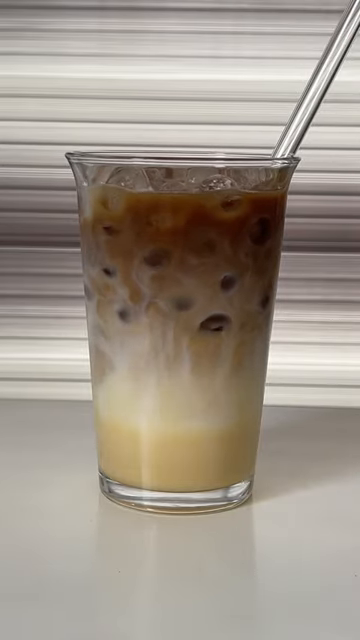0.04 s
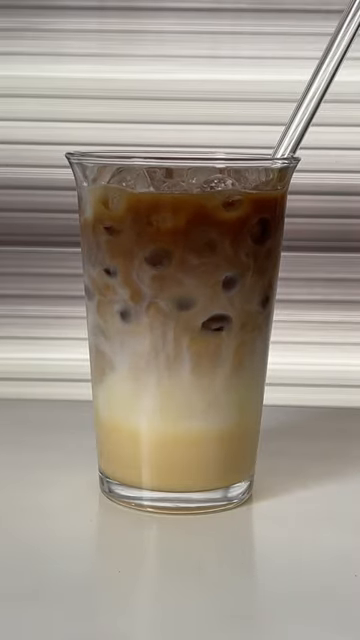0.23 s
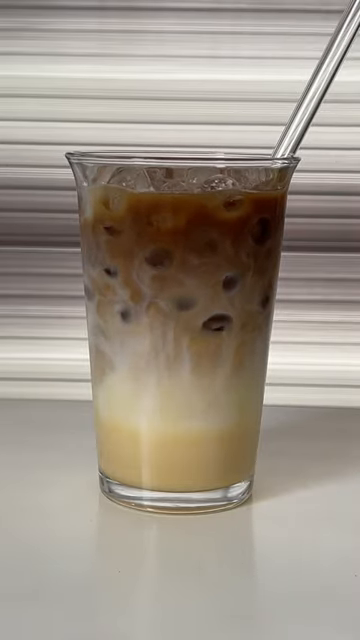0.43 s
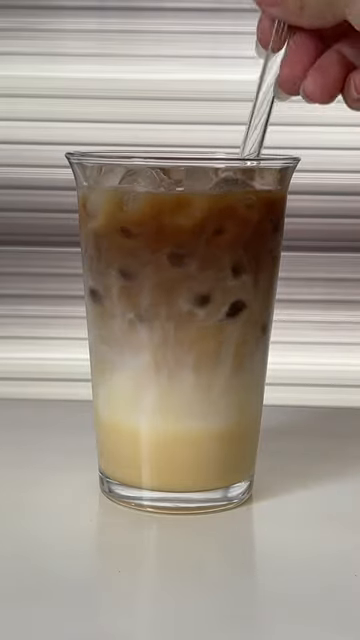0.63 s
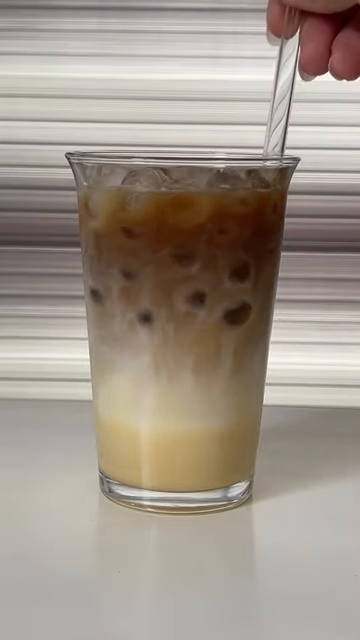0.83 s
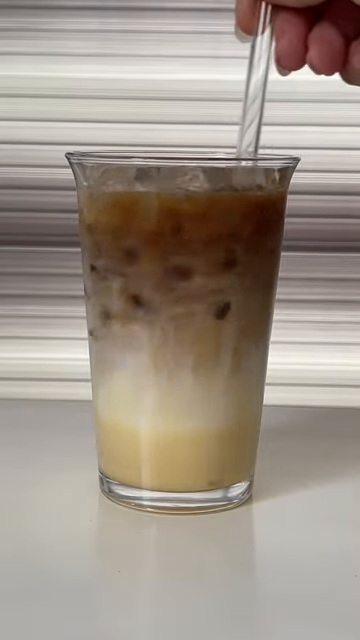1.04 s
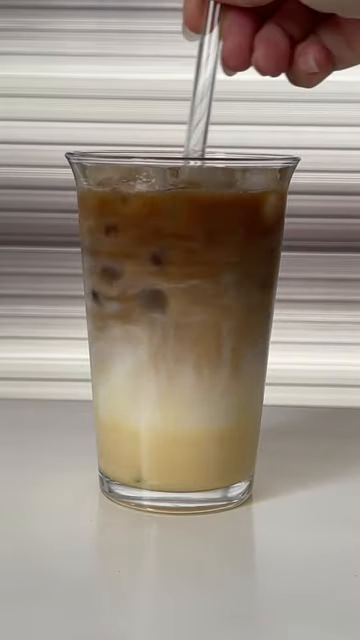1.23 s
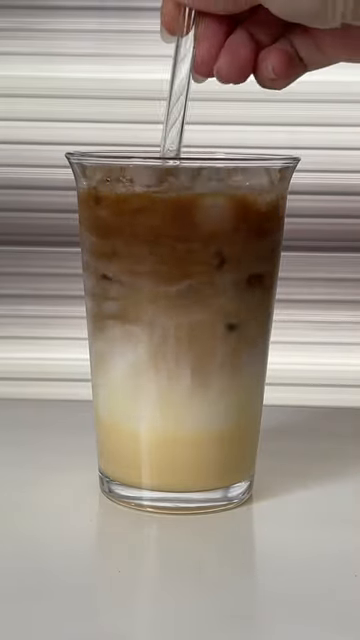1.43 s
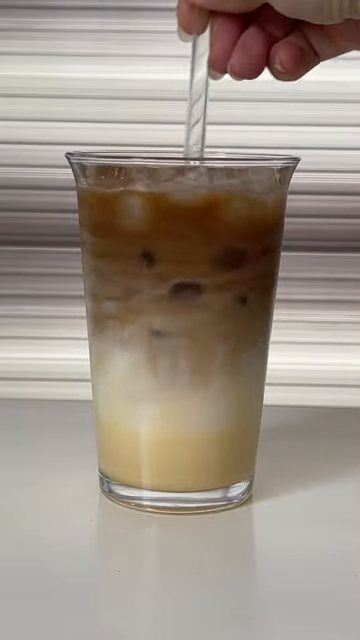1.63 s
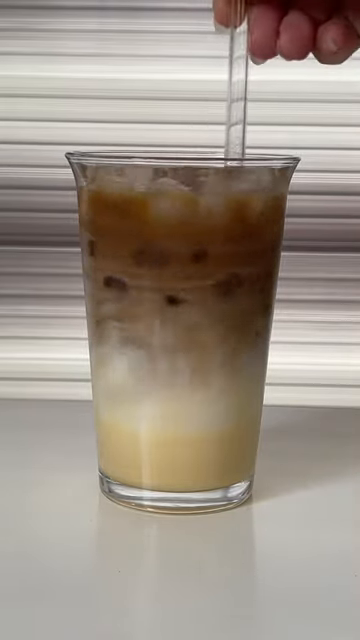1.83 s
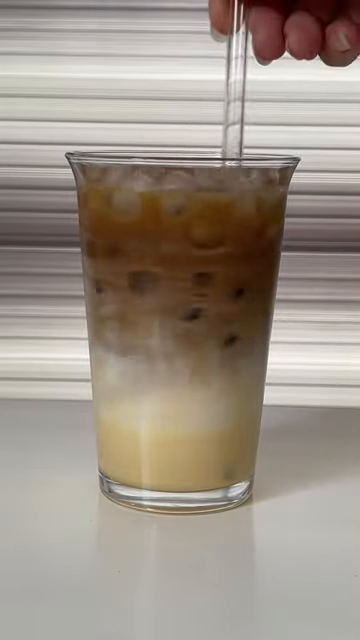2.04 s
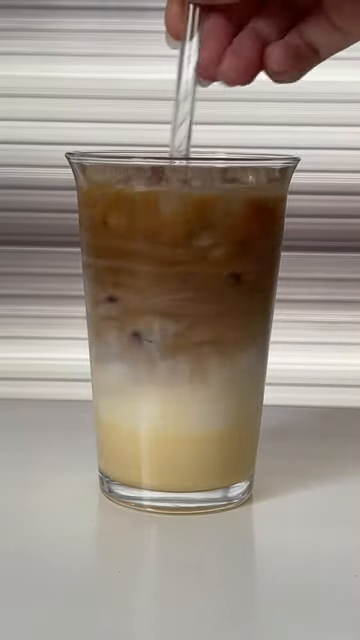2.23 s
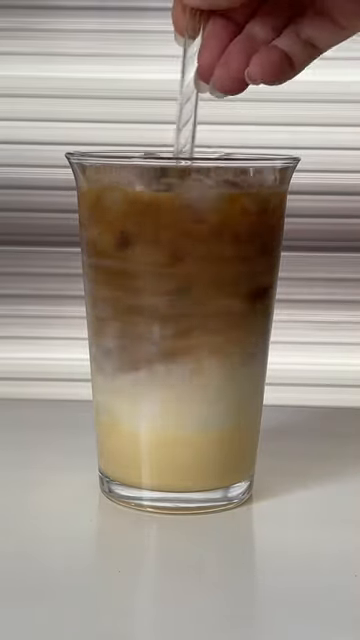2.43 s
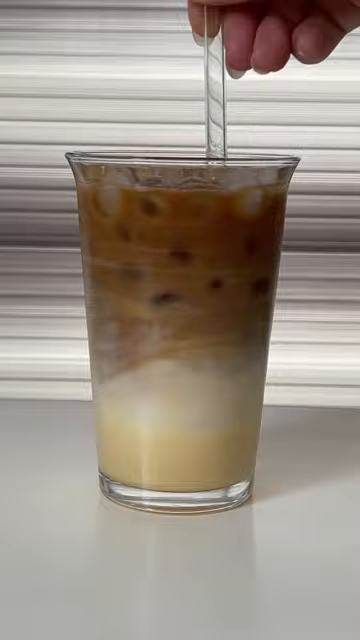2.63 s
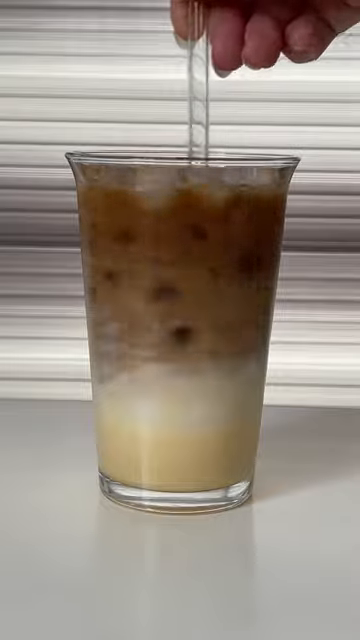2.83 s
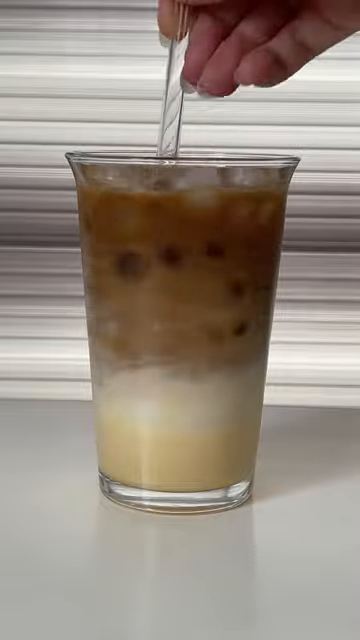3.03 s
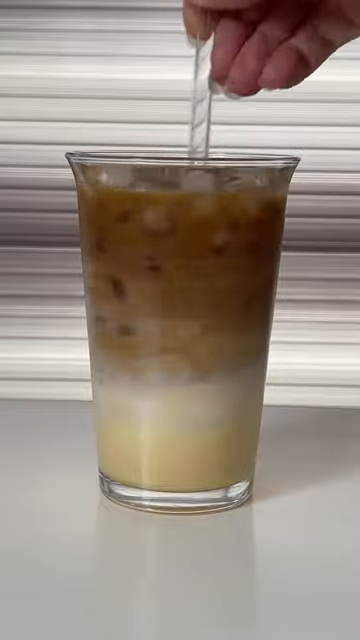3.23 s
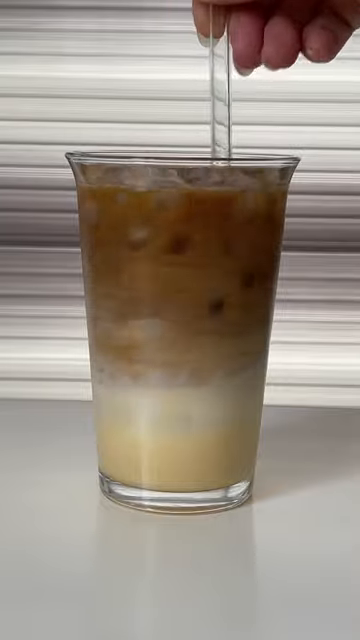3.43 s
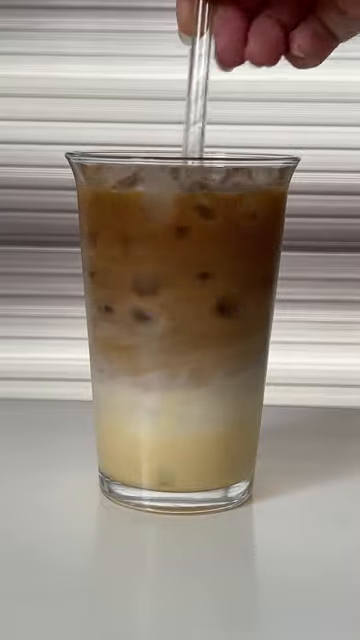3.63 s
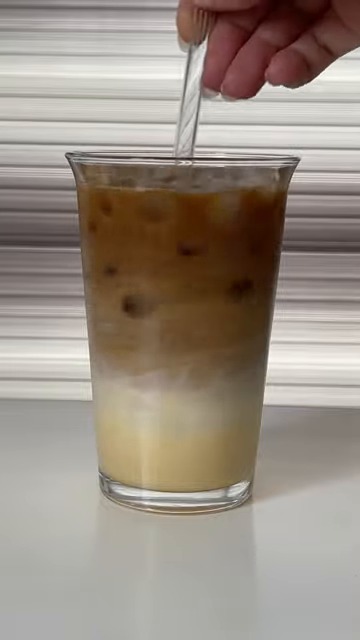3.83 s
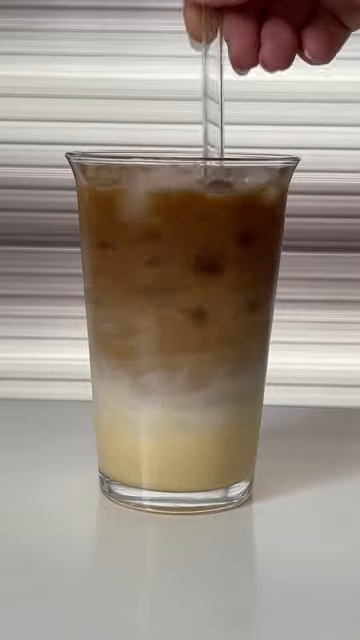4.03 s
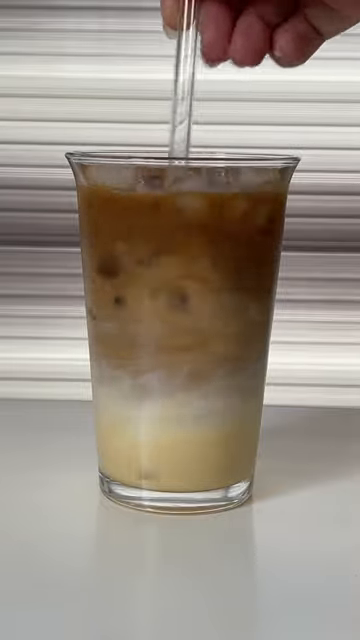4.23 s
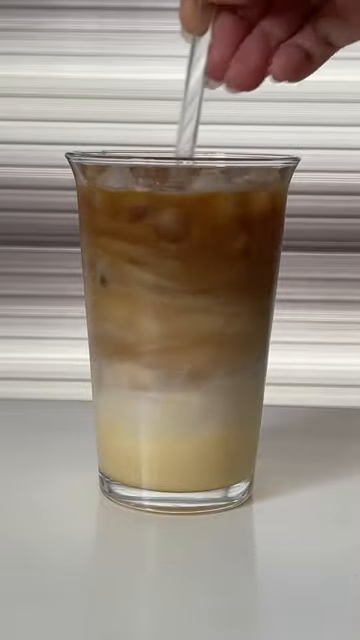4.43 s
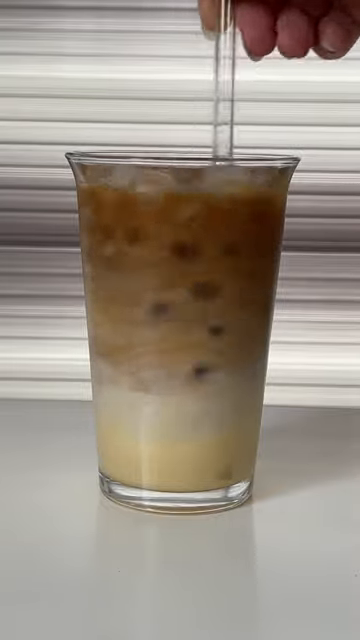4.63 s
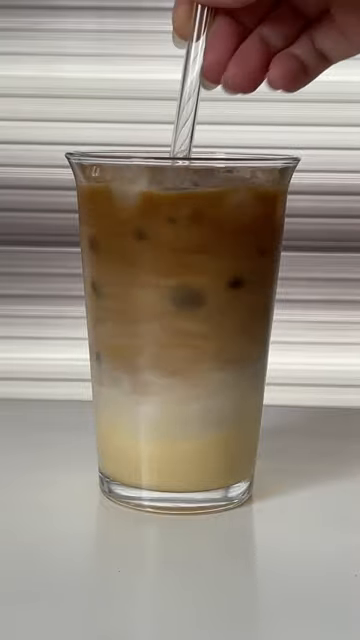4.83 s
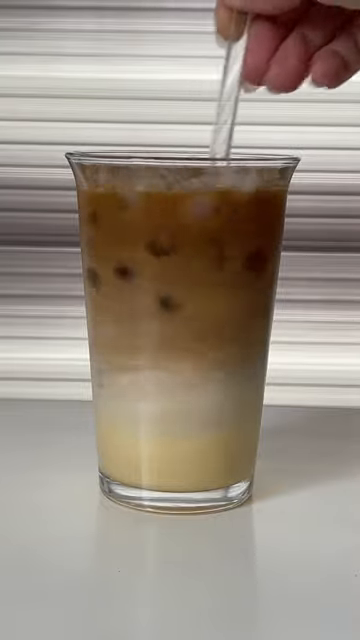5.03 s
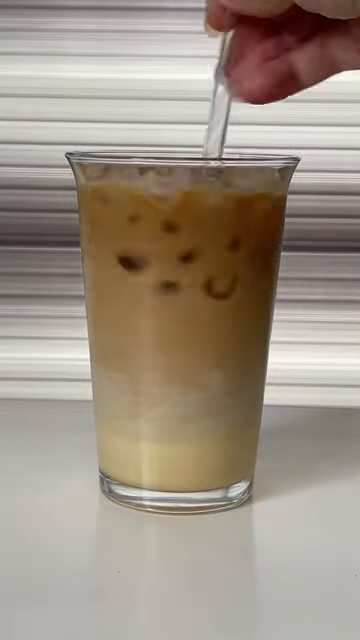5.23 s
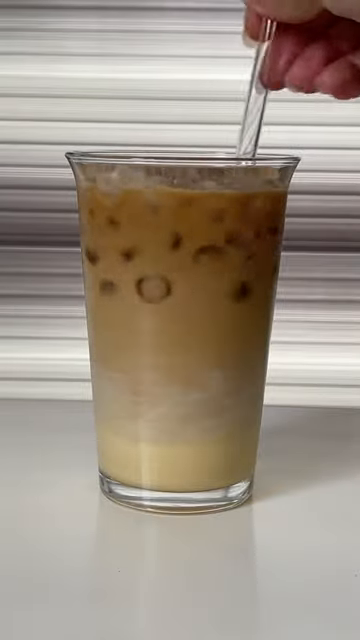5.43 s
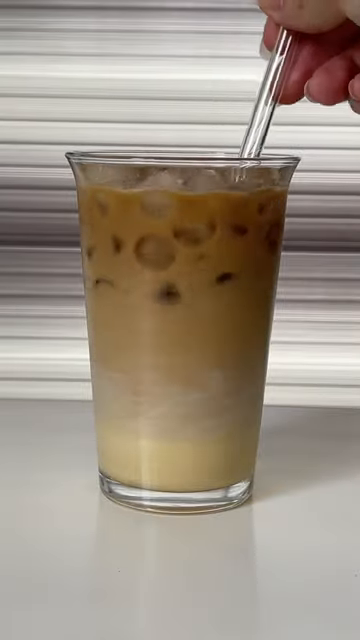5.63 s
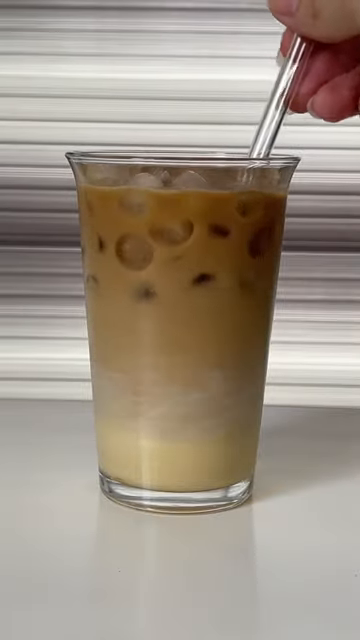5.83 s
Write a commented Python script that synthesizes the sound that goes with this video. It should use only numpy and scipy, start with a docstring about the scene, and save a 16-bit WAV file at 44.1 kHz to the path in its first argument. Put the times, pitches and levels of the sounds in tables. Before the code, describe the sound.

A glass straw stirs iced coffee: dense, bright, short ice clinks, swelling and easing, with a few dull knocks on the glass bottom.

```python
"""Ice cubes, stirred with a glass straw, strike a full tall glass: filtered blows excite its damped modes.
Blows of the straw on the bottom rock glass and table as lower modes, with a short diffuse echo.
Coloured noise gives the slosh of the drink, the hush of the quiet room and a low shaking of table and air.
The sound drops out twice for a moment; the two channels differ mostly by a turn of phase."""
import sys
import numpy as np
from scipy import signal
from scipy.fft import rfft, irfft, next_fast_len
from scipy.io import wavfile
from scipy.ndimage import uniform_filter1d

SR = 44100
rng = np.random.default_rng(int(sys.argv[2]) if len(sys.argv) > 2 else 0)


def volts(x):
    """Linear amplitude factor 10**(x/20) for a level x in dB, scalar or array-like."""
    e = np.asarray(x, float) / 20
    return 10 ** e


def transcribe(signal):
    """Save signal, clipped to [-1, 1], as a 16-bit WAV file at the path in sys.argv[1]."""
    frames = np.atleast_2d(signal).T
    limited = np.clip(frames, -1, 1)
    pcm = np.round(limited * 32767).astype(np.int16)
    wavfile.write(sys.argv[1], SR, pcm)


N = 260190


def unit_rms(x):
    """Power normalisation: scales a signal to rms 1."""
    return x / np.sqrt(np.mean(x ** 2) + 1e-20)


def read_spectrum(points, hz):
    """Logarithmic frequency scale: interpolates the level between tabled points."""
    f, value = np.transpose(points)
    return np.interp(np.log(hz + 1), np.log(f + 1), value)


def noise(spectrum):
    """Spectral shaping: steady white noise is filtered to the given colour, at rms 1."""
    hz = np.fft.rfftfreq(N, 1 / SR)
    white = rng.standard_normal(N)
    return unit_rms(irfft(rfft(white) * volts(read_spectrum(spectrum, hz)), N))


def swelling(rows, rest_db, rise_db_per_s, fall_db_per_s):
    """Exponential growth and decay: events (start, length, level) add in power to a resting level."""
    t = np.arange(0, N + 64, 64) / SR
    power = volts(rest_db) ** 2
    for start, length, db in rows:
        before = np.maximum(start - t, 0)
        after = np.maximum(t - start - length, 0)
        power = power + volts(db - rise_db_per_s * before - fall_db_per_s * after) ** 2
    return np.interp(np.arange(N) / SR, t, np.sqrt(power))


def ring(modes):
    """Modal superposition: exponentially decaying sines answer one click."""
    t = np.arange(4096) / SR
    return sum(volts(db - 60 * t / t60) * np.sin(2 * np.pi * hz * t) for hz, db, t60 in modes)


# colour of the room hush: (frequency [Hz], relative density [dB])
ROOM_COLOUR = [(15, -71), (25, -33), (38, -25), (59, -5.5), (81, -12.5), (165, -28), (193, -12.5),
               (800, -30), (3450, -43), (5000, -47), (8000, -42), (13100, -31.5)]
ROOM_DB = -72.5  # rms


def room_hush():
    """Stationary background noise: a steady coloured hush common to both channels."""
    return volts(ROOM_DB) * noise(ROOM_COLOUR)


# colour of the low shaking: (frequency [Hz], relative level [dB])
SHAKE_COLOUR = [(25, -40), (40, 8.5), (57, 8), (90, 2.5), (160, -5.5), (300, -29)]
# its swells: (time [s], level [dB])
SWELLS = [(1.48, -65), (1.77, -69), (1.99, -63), (2.55, -68), (3.27, -66), (4.03, -66), (4.58, -59.5),
          (4.78, -59), (4.95, -51.5), (5.15, -59.5), (5.39, -60.5), (5.67, -64)]


def rumble():
    """Amplitude modulation: low noise of the shaking table and air swells over a steady level."""
    events = [(s, 0, db) for s, db in SWELLS]
    gain = swelling(events, rest_db=-75.5, rise_db_per_s=65, fall_db_per_s=125)
    return gain * noise(SHAKE_COLOUR)


# sweeps of the straw through the cubes: (start [s], length [s], jostle level [dB])
STROKES = [(.52, 0.043, -65.5), (.7, 0.062, -64.5), (.9, 0.022, -60.5), (1.13, 0.077, -65), (1.3, .38, -50),
           (1.8, 0.062, -60), (1.92, 0.024, -67.5), (2.04, 0.062, -65), (2.16, 0.21, -52.5),
           (2.5, 0.038, -57), (2.66, 0.074, -65), (2.79, 0.017, -55), (2.96, .03, -67.5), (3.07, 0.27, -55),
           (3.42, .05, -65.5), (3.55, 0.15, -60.5), (3.85, 0.2, -50.5), (4.14, 0.057, -61.5),
           (4.33, 0.028, -55.5), (4.44, .14, -44.5), (4.68, 0.13, -56.5), (4.95, 0.2, -47),
           (5.3, 0.038, -55.5), (5.51, .04, -66.5), (5.63, 0.12, -64), (5.82, 0.021, -68.5)]


def stirring():
    """Exponential envelope: how strongly the cubes jostle over time."""
    return swelling(STROKES, rest_db=-77.5, rise_db_per_s=135, fall_db_per_s=137)


def jostling():
    """Gated envelope: the stirring, silent until the first drop-out has ended."""
    return stirring() * (np.arange(N) > GAPS[0][1] * SR)


# colour of the hush that differs between the channels: (frequency [Hz], relative level [dB])
APART_COLOUR = [(60, -26), (150, -21.5), (400, -14.5), (900, -17.5), (1500, -20.5), (2200, -71)]


def channel_hush():
    """Interchannel decorrelation: noise of opposite sign left and right, partly following the stirring."""
    gain = volts(ROOM_DB - 6.5) + volts(-34.5) * stirring()
    return gain * noise(APART_COLOUR)


def contact(rise_s, fall_s):
    """Contact mechanics: how hard ice presses during a blow, at unit energy."""
    t = np.arange(4096) / SR
    rise = (t / rise_s) ** 2 / (1 + (t / rise_s) ** 2)
    shape = rise * np.exp(-t / fall_s)
    return shape / np.linalg.norm(shape)


# clear knocks: (time [s], level [dB], frequency of the mode favoured by the struck spot [Hz],
# least share of the deep wall modes [dB], least share of the sharp top modes [dB])
KNOCKS = [(0.4204, -53, 10200, -28, -8), (0.5052, -32.5, 2230, -9, -21), (0.5114, -39, 1670, -21, -27),
          (0.608, -39.5, 1730, -10, -18), (0.625, -30.5, 7260, -14, -19), (0.6602, -21, 4280, -14.5, -17),
          (0.7111, -34.5, 4540, -22, -32), (0.7382, -54, 7210, -4, -26), (0.7648, -36.5, 2200, -2, -36),
          (0.8082, -38.5, 7100, -5.5, -25), (0.8482, -41, 1660, -19, -29), (0.8769, -36, 7200, -13, -9),
          (0.8912, -31.5, 7150, -22, -7), (0.9228, -40.5, 2260, -17, -2), (0.9367, -35.5, 7410, -18, -13),
          (0.9826, -34.5, 2220, -4.5, -22), (1.0143, -30, 7600, -15, -18), (1.0876, -41, 2230, -17, -25),
          (1.112, -36.5, 4600, -14, -16), (1.1258, -39, 7300, -12, -29), (1.1715, -37.5, 1720, -7, -12),
          (1.219, -44, 1680, -17, -18), (1.2745, -34, 7300, -15, -23), (1.2814, -33, 4480, -11, -30),
          (1.2944, -35, 7600, -22, -19), (1.3033, -47, 1690, -25, -20), (1.3448, -45, 4530, -24, -26),
          (1.3654, -33, 4530, -17, -27), (1.4168, -28, 7580, -12, -22), (1.4264, -27, 4370, -9, -23),
          (1.4564, -27, 4380, -25, -21), (1.4701, -26, 2000, -19, -14), (1.5026, -23, 7600, -16, -15),
          (1.5124, -24.5, 7600, -21, -18), (1.5723, -30, 7060, -15, -14), (1.5774, -28.5, 4300, -14, -4.5),
          (1.62, -28.5, 7280, -11, -7), (1.6356, -22, 7400, -18, -4), (1.6465, -19, 7700, -19, -11),
          (1.651, -31, 7200, -18, -18), (1.6684, -26, 7400, -15, -20), (1.7449, -30.5, 7360, -26, -28),
          (1.788, -42.5, 7420, -9, -8), (1.8209, -22.5, 7660, -40, -17), (1.839, -23.5, 7600, -34, -18),
          (1.8474, -39, 7380, -21, -19), (1.9756, -48, 1680, -11, -25), (2.0259, -44, 1710, -2, -30),
          (2.1136, -34.5, 4450, -10, -23), (2.144, -33.5, 4490, -25, -6), (2.1502, -35, 4510, -24, -18),
          (2.183, -49, 3260, -18, -9), (2.1937, -36, 1650, -10, -3), (2.2124, -26, 1690, -13, -14),
          (2.2268, -41, 1700, -15, -19), (2.2754, -29, 7460, -8.5, -24), (2.2858, -33, 1680, -4, -14),
          (2.3156, -23.5, 3700, -27, -25), (2.3392, -32, 3840, -15, -15), (2.4581, -31, 1880, -14.5, -18),
          (2.4713, -33, 1690, -6, -22), (2.4909, -35.5, 6960, -14, -27), (2.5478, -35.5, 1750, -5, -8),
          (2.579, -32.5, 2220, -20, -23), (2.6244, -40.5, 7240, -4.5, -23), (2.6542, -39, 2100, -5.5, -31),
          (2.7046, -38, 1780, -14, -22), (2.7173, -30.5, 2140, -19, -15), (2.7733, -31.5, 1620, -14, -41),
          (2.9536, -41.5, 2350, -11, -25), (3.0395, -35.5, 1650, -17, -20),
          (3.0775, -31.5, 7500, -10.5, -14), (3.0921, -25.5, 7440, -22, -26), (3.1564, -32, 4150, -9, -14),
          (3.1897, -32.5, 7000, -15, -23), (3.2125, -36.5, 7120, -21, -9), (3.2284, -36.5, 1650, -16, -11),
          (3.2869, -33, 2210, -6, -16), (3.3458, -36, 1570, -11, -20), (3.4122, -36.5, 2240, -6, -22),
          (3.4882, -41, 7640, -11, -17), (3.5235, -36, 7250, -6, -12), (3.5473, -50, 1510, -19, -10),
          (3.5597, -27, 7200, -15, -25), (3.5922, -40, 7300, -9, -21), (3.6496, -36.5, 10900, -8.5, -17),
          (3.693, -45, 1700, -15, -25), (3.726, -34, 7500, -20, -22), (3.7331, -27.5, 7600, -13, -20),
          (3.78, -36, 4500, -11, -11), (3.8257, -35, 7500, -22, -8), (3.8573, -27.5, 10700, -10, -12),
          (3.8727, -25, 4510, -24, -18), (3.8812, -28.5, 11000, -9, -4), (3.907, -11.5, 7200, -23, -5),
          (3.935, -28, 7040, -20, -7), (3.9567, -21.5, 7550, -20, -18), (3.9948, -28, 7700, -20, -16),
          (4.0041, -18.5, 7200, -14.5, -26), (4.017, -26, 7250, -13, -17), (4.0253, -33, 7230, -12, -21),
          (4.0946, -37, 4440, -6, -30), (4.164, -43.5, 1660, -15, -3), (4.2808, -27.5, 7960, -11.5, -16),
          (4.2904, -30, 7460, -10, -14), (4.3018, -23, 7800, -11.5, -22), (4.3784, -31.5, 3730, -29, -8),
          (4.401, -31, 4330, -20, -19), (4.4238, -20.5, 4440, -19, -10), (4.4774, -20.5, 1780, -26, -13),
          (4.4996, -32.5, 1680, -10, -9), (4.5198, -17, 7300, -23, -11), (4.5376, -17, 6730, -16, -12),
          (4.5382, -12, 1710, -16.5, -3.5), (4.5586, -22, 11100, -20, -13), (4.576, -25.5, 7400, -22, -18),
          (4.6058, -28, 7400, -18, -21), (4.6585, -27.5, 1710, -11.5, -14.5),
          (4.755, -33.5, 4550, -3.5, -13), (4.8001, -29.5, 7250, -21, -23), (4.8514, -32.5, 7350, -14, -8),
          (4.8755, -34.5, 2240, -18, -11), (4.8947, -23, 4430, -16, -6), (4.9412, -25.5, 4500, -27, -15),
          (4.9576, -26.5, 1680, -16, -0.5), (4.9786, -21.5, 7240, -20, -7), (5.0493, -20.5, 7070, -40, -8),
          (5.083, -29, 1830, -14, -11), (5.0992, -23.5, 7800, -8, -17), (5.1063, -25.5, 1680, -19, -13),
          (5.1396, -26, 2170, -12, -8), (5.1716, -37, 7250, -18, -17), (5.247, -31, 7360, -10, -22),
          (5.2976, -30.5, 7400, -15, -18), (5.3049, -30.5, 4600, -16, -31), (5.3178, -35, 4450, -14, -22),
          (5.3552, -38, 7200, -17, -14), (5.374, -30.5, 7200, -15, -24), (5.4196, -36, 4440, -14, -22),
          (5.4996, -36, 4500, -14, -21), (5.5102, -32, 7300, -11, -25), (5.5234, -44, 4500, -6, -10),
          (5.5582, -40, 7150, -6, -37), (5.6224, -34, 3350, -6, -28), (5.6332, -32, 1760, -9, -22),
          (5.6456, -27.5, 1910, -19, -17.5), (5.7398, -39, 4520, -10, -26), (5.7474, -38.5, 2170, -9, -28),
          (5.7702, -48, 7460, -5, -20), (5.8094, -37.5, 4520, -23, -33), (5.8296, -34, 7210, -11.5, -15)]
# frequency bands of the glass: (low edge [Hz], high edge [Hz])
BANDS = [(1000, 2100), (2100, 3800), (3800, 6000), (6000, 9000), (9000, 11800)]
# modes of the filled glass: (frequency [Hz], relative level within its band [dB], t60 [s])
GLASS_MODES = [(1346, 3, 0.086), (1676, 11.5, 0.046), (1820, 14, 0.015), (2275, 3, 0.026),
               (2680, 3.5, 0.011), (3045, -6, 0.03), (4520, 10.5, 0.012), (4720, -6.5, 0.033),
               (5100, 1.5, 0.02), (7324, 0.5, 0.0097), (7210, -13.5, 0.014), (7750, -3.5, 0.011),
               (8300, -4, 0.0096), (10210, -0.5, 0.019), (11000, 8, 0.01), (9900, -37, 0.0092)]
# small knocks per band: (level [dB])
JOSTLE_DB = [-10.5, -14.5, -6.5, -4, -9]
# bare crack beside the modes per band: (relative level [dB])
CRACK_DB = [-3.5, 4, -6, -20.5, -3]
# crackle that differs left and right per band: (relative level [dB])
UNLIKE_DB = [-21, -12, -9, -12, -11]
# gain of the clear knocks per band: (gain [dB])
KNOCK_DB = [6, 5.8, 8.7, 12.9, 17.2]


def ice():
    """Modal excitation: each blow, a tap and a puff of crackle, drives glass modes and crack by chance amounts."""
    time_s, level_db, favoured_hz, deep_db, sharp_db = np.transpose(KNOCKS)
    span = next_fast_len(N + 4096)
    at = np.round(time_s * SR).astype(int)
    small = np.flatnonzero(rng.random(N) < 220 / SR)  # 220 small knocks a second on average
    size_db = 3.0 * np.minimum(rng.exponential(1, len(small)), 3)
    stir = jostling()
    press = contact(0.00046, 0.00056) + volts(-12) * contact(0.0049, 0.0074)
    load = np.minimum(np.arange(4096) / SR / 0.00068, 1)  # soft ice takes a moment to load the wall
    spectrum = 0
    for k, (lo, hi) in enumerate(BANDS):
        band_filter = signal.butter(3, [lo, hi], "band", fs=SR, output="sos")
        crack = signal.sosfilt(band_filter, np.eye(1, 4096)[0])
        in_band = [m for m in GLASS_MODES if lo < m[0] < hi]
        modes = [ring([m]) for m in in_band]
        whole = np.linalg.norm(modes)
        pitches = [m[0] for m in in_band] + [np.sqrt(lo * hi)]
        bodies = [m / whole for m in modes] + [volts(CRACK_DB[k]) * crack / np.linalg.norm(crack)]
        for hz, body in zip(pitches, bodies):
            chance, crackle, other = rng.standard_normal((3, N))
            small_chance_db = 7 * np.clip(chance[small], -3, 1.5)
            knock_chance_db = 7 * np.clip(chance[at], -3, 1.5)
            blows = np.zeros(N)
            blows[small] = volts(size_db + small_chance_db)
            blows = unit_rms(blows) * stir * volts(JOSTLE_DB[k])

            # modes fade away from the favoured one, 30 dB per octave, down to a least share
            if hz < 3800:
                least_db = deep_db
            elif hz > 9000:
                least_db = sharp_db
            else:
                least_db = -11
            share_db = np.maximum(-30 * abs(np.log2(hz / favoured_hz)), least_db)
            blows[at] = volts(level_db + share_db + KNOCK_DB[k] + 0.39 * knock_chance_db)

            unlike = volts(UNLIKE_DB[k]) * np.array([other, -other])
            puff = signal.oaconvolve(blows, press)[:N] * (np.sign(crackle) + unlike)
            spectrum = spectrum + rfft(puff, span) * rfft(body, span)
            spectrum = spectrum + volts(-5.0) * rfft(blows, span) * rfft(body * load, span)  # tap
    return irfft(spectrum, span)[:, :N]


# colour of the moving drink: (frequency [Hz], relative level [dB])
SLOSH_COLOUR = [(60, -48), (160, -4.5), (300, -10), (460, -4), (800, -25), (1500, -6), (3000, -17),
                (6000, -20.5), (11500, -46), (13000, -58)]


def slosh():
    """Amplitude modulation: coloured noise of the drink follows the jostling, 7 dB below it."""
    return volts(-7) * jostling() * noise(SLOSH_COLOUR)


# blows that rock the whole glass on the table: (time [s], level [dB])
THUDS = [(0.509, -55.5), (0.704, -50), (1.346, -45.5), (1.481, -50.5), (1.552, -57), (1.654, -43),
         (2.186, -50.5), (2.55, -49), (3.04, -57.5), (3.137, -47.5), (3.194, -51), (3.248, -43),
         (3.908, -39.5), (4.549, -67), (4.607, -45), (4.901, -44), (4.962, -45), (4.998, -24.5),
         (5.149, -29.5), (5.311, -51), (5.345, -39), (5.622, -41.5)]
# modes of glass and table together: (frequency [Hz], relative level [dB], t60 [s])
TABLE_MODES = [(228, -8, 0.044), (470, -11.5, 0.17), (495, -3.5, 0.04), (691, -3.5, 0.027),
               (814, -7, 0.039), (954, -11.5, 0.093)]


def thuds():
    """Forced modal response: a push of a few milliseconds with a harder tip rocks glass and table."""
    blows = np.zeros(N)
    for s, db in THUDS:
        blows[round(s * SR)] = volts(db)
    push = np.hanning(260) * np.sin(2 * np.pi * 490 * np.arange(260) / SR)
    push[90:110] += 4.2 * np.hanning(20)  # the harder tip
    thud = np.convolve(ring(TABLE_MODES), push)
    return signal.oaconvolve(blows, thud / abs(thud).max())[:N]


def echo(x):
    """Diffuse reflection: sparse taps of random sign, t60 0.15 s, from table top and nearby walls."""
    at = np.arange(300, 12000, 20)
    level = volts(-60 * at / SR / 0.15)
    taps = np.zeros(12020)
    taps[at + rng.integers(0, 20, len(at))] = rng.choice([-1., 1.], len(at)) * level
    return signal.oaconvolve(x, taps / np.linalg.norm(taps))[:N]


# phase between the channels: (frequency [Hz], lead of the left channel [rad])
PHASE_LEAD = [(0, 0), (1500, 0), (4000, .8), (4600, 1.75), (4900, 3.2), (5200, 5), (5500, 5.95),
              (5800, 6.26), (6200, 6.5), (7000, 7.55), (8500, 9), (9500, 9.6), (11500, 11.6), (12000, 12.6),
              (13500, 12.9)]


def turn_phase(x):
    """Interchannel phase difference: left advances and right lags by half the lead at each frequency."""
    size = next_fast_len(N + 4096)
    lead = np.interp(np.fft.rfftfreq(size, 1 / SR), *np.transpose(PHASE_LEAD))
    turn = np.exp(.5j * lead)
    return irfft(rfft(x, size) * np.array([turn, 1 / turn]), size)[:, :N]


def scene():
    """Linear superposition: all sources add, then the channels part in phase and hush."""
    background = room_hush() + rumble()
    apart = channel_hush()
    stirred = ice() + slosh()
    thud = thuds()
    near = stirred + thud + volts(-8.5) * echo(thud) + background
    return turn_phase(near) + [apart, -apart]


def roll_off(x):
    """The treble ends steeply here."""
    return signal.sosfilt(signal.butter(12, 13280, fs=SR, output="sos"), x)


# moments at which the sound drops out: (from [s], to [s])
GAPS = [(0.4826, .5015), (5.267, 5.2815)]


def record(dry):
    """Band limitation and gating: a zero-phase low-pass, then two short drop-outs with softened edges."""
    t = np.arange(N) / SR
    on = np.prod([(t < a) | (t > b) for a, b in GAPS], axis=0)
    low_pass = signal.butter(7, 11230, fs=SR, output="sos")
    dull = signal.sosfiltfilt(low_pass, dry)
    mix = dull * uniform_filter1d(on * 1., 40)
    return roll_off(mix)


dry = scene()
out = record(dry)
transcribe(out)
```